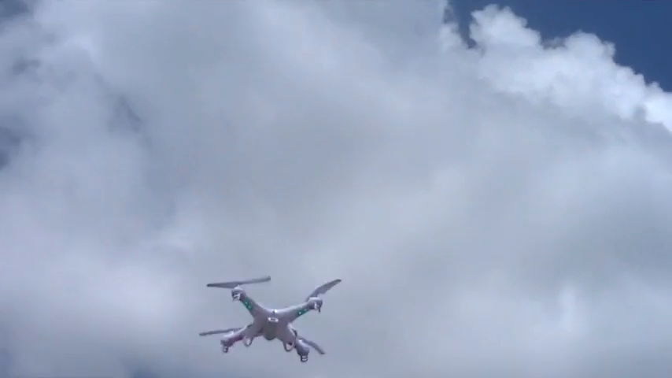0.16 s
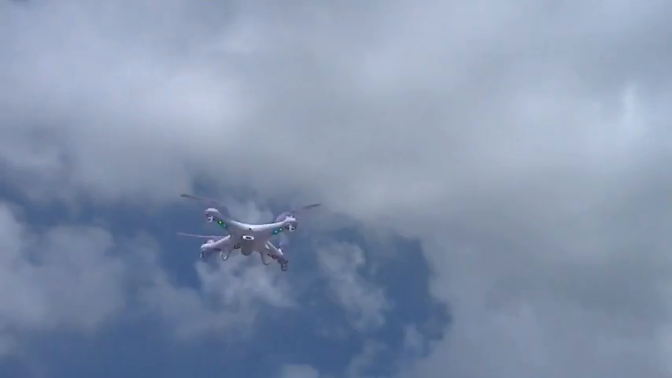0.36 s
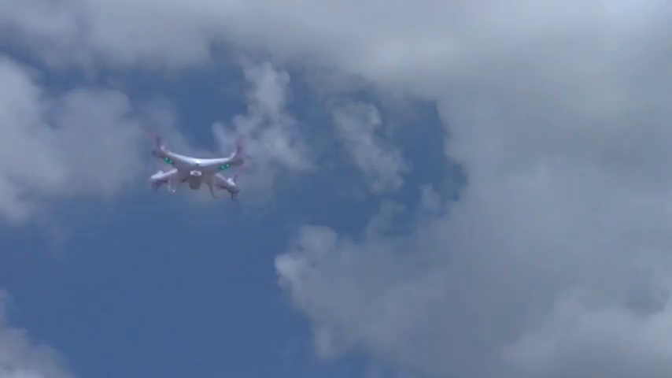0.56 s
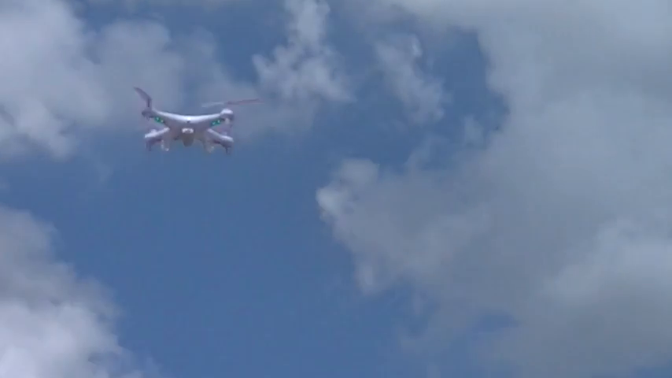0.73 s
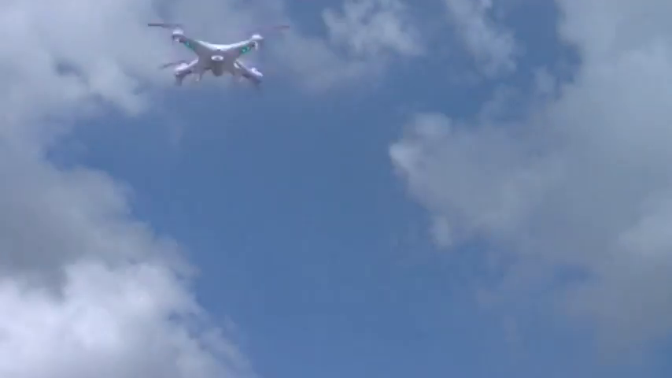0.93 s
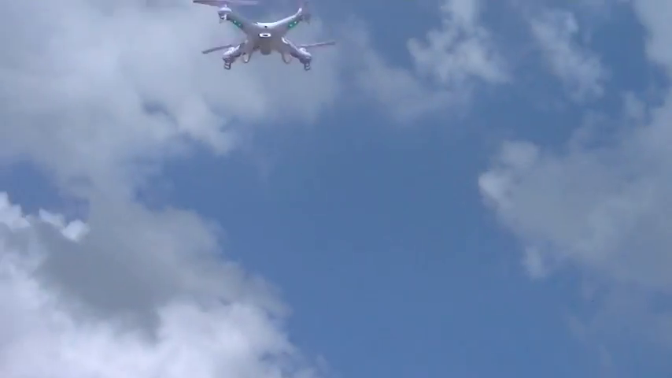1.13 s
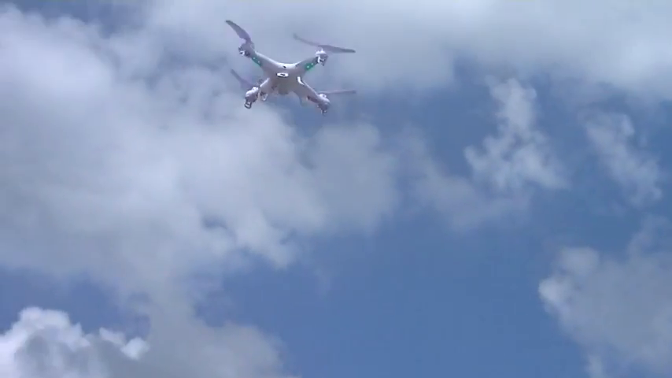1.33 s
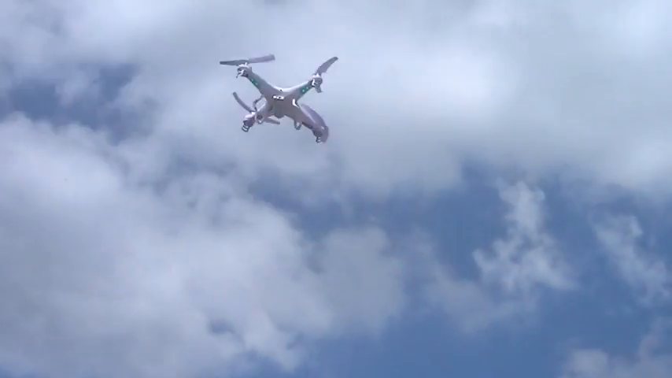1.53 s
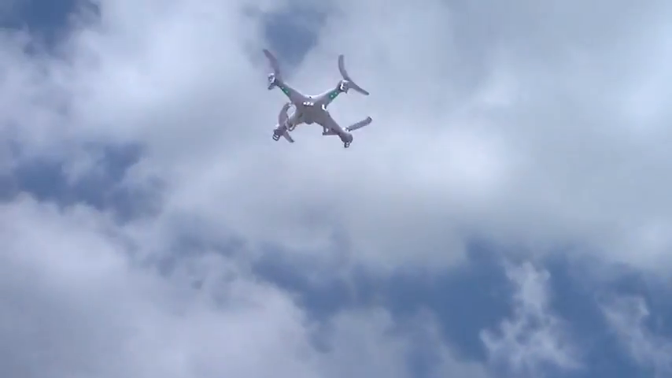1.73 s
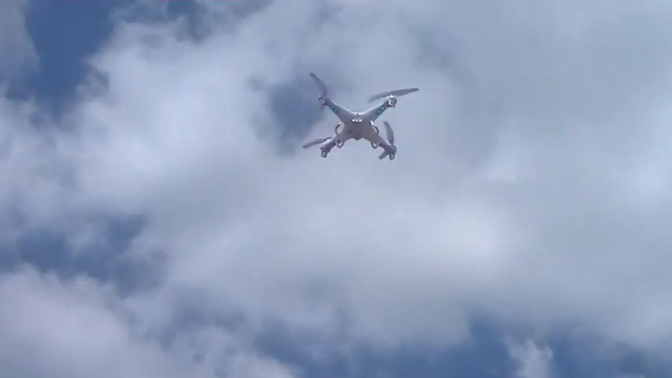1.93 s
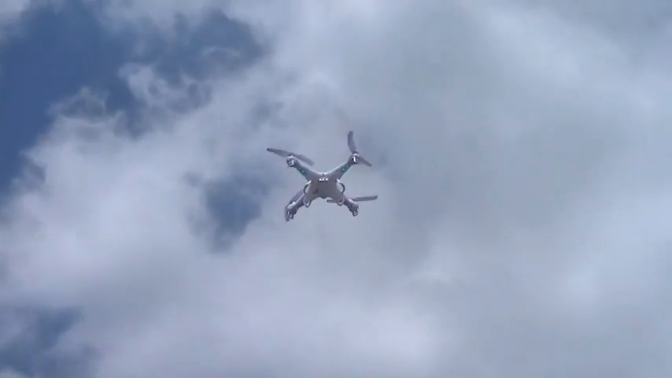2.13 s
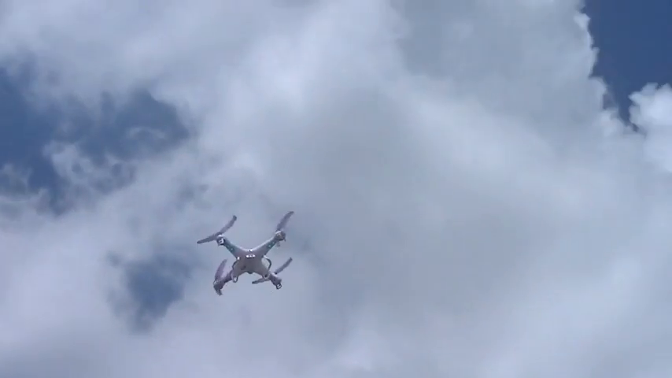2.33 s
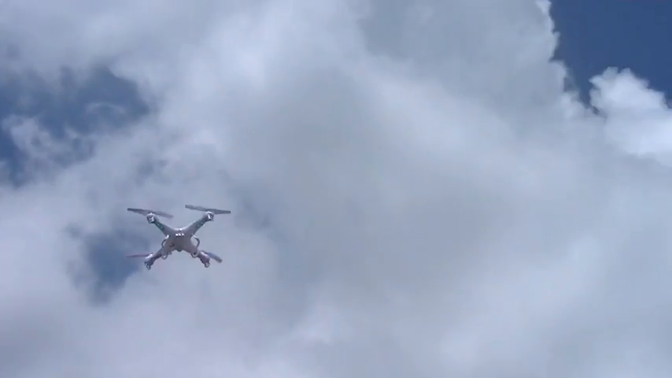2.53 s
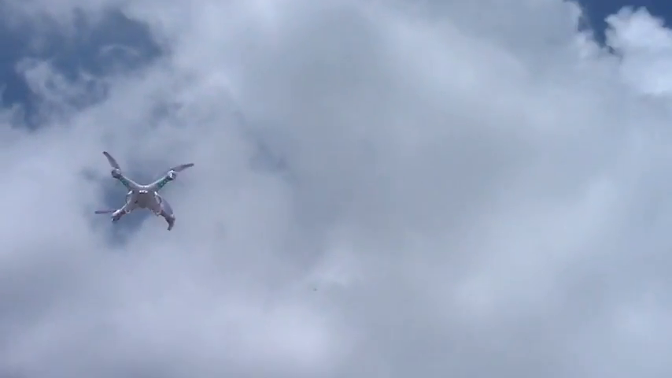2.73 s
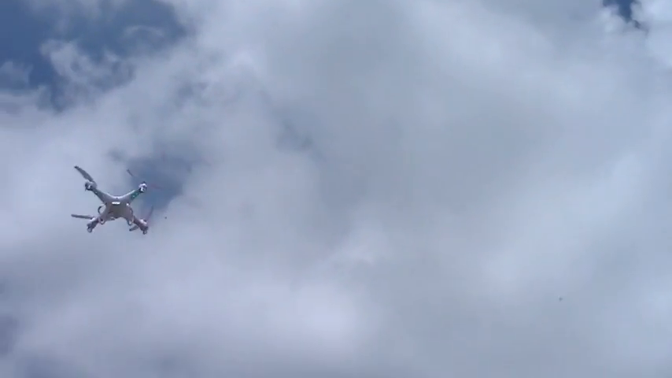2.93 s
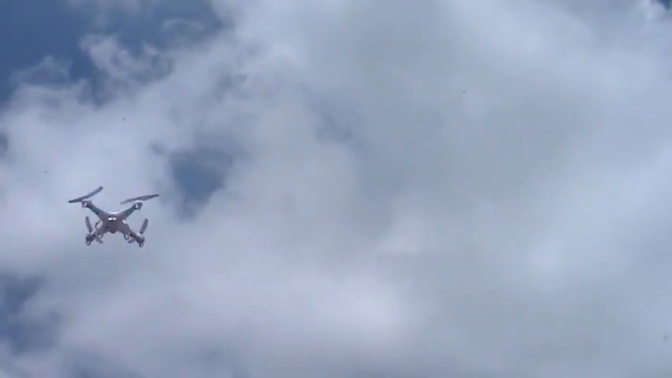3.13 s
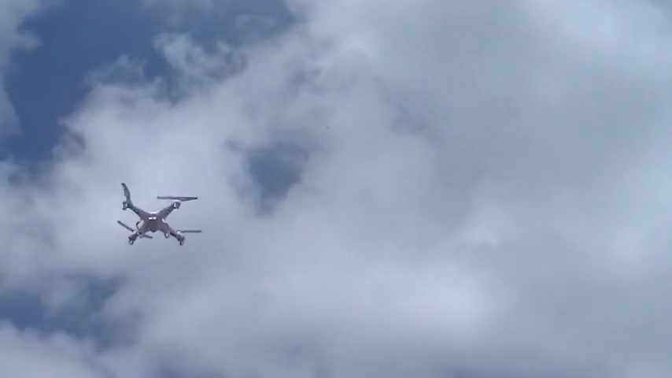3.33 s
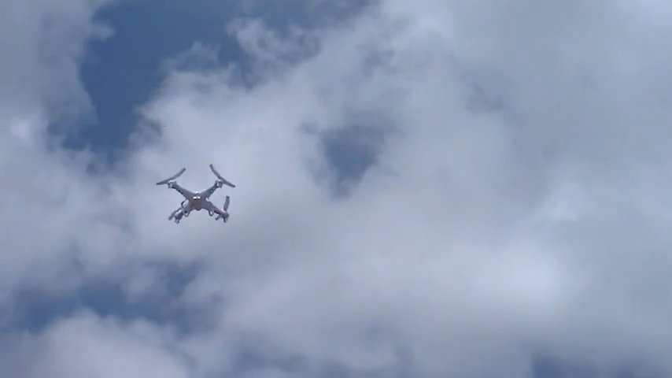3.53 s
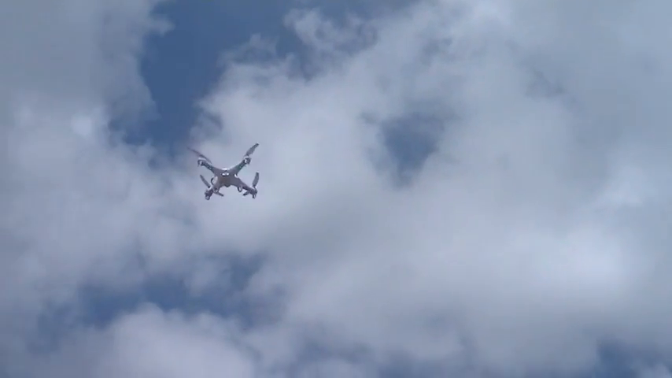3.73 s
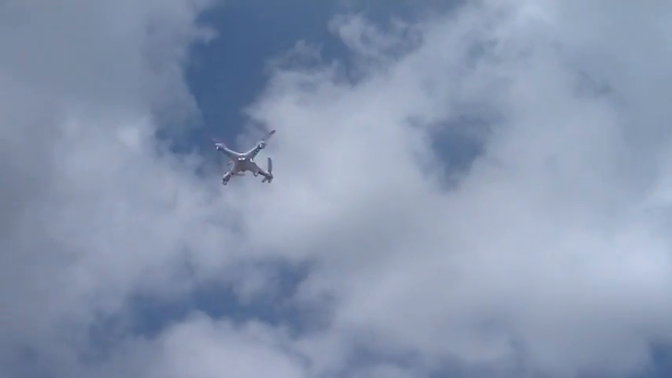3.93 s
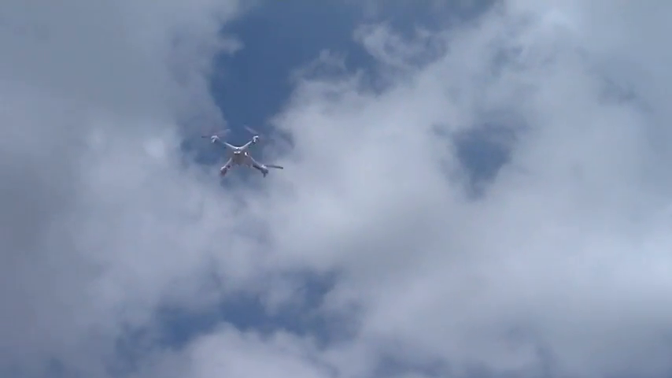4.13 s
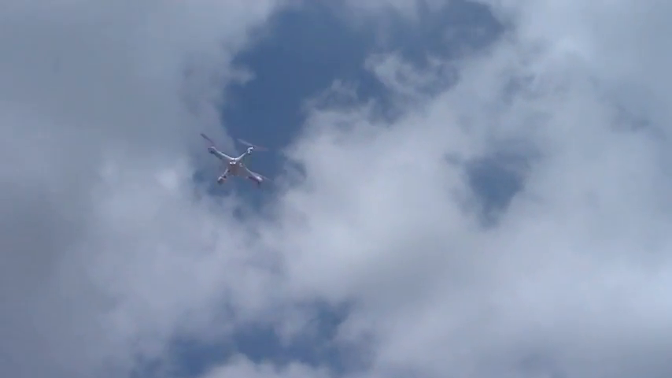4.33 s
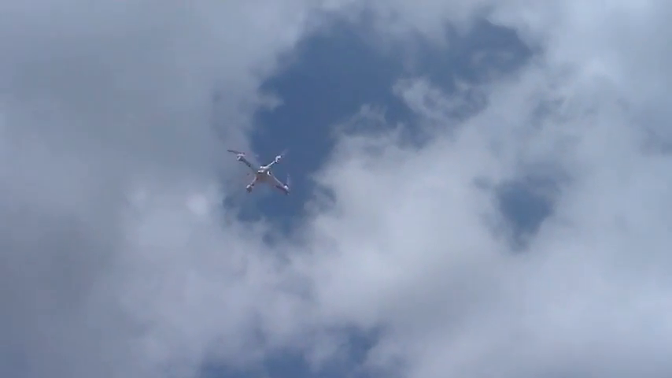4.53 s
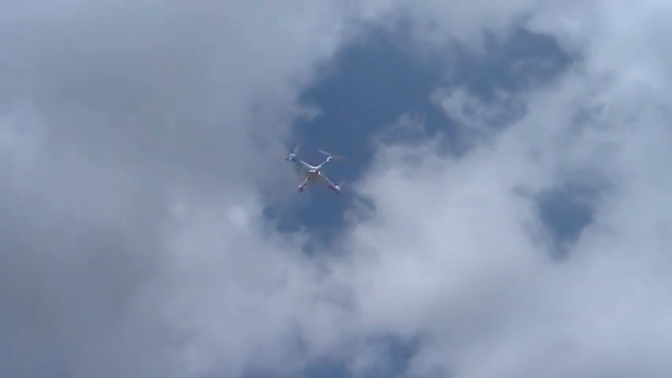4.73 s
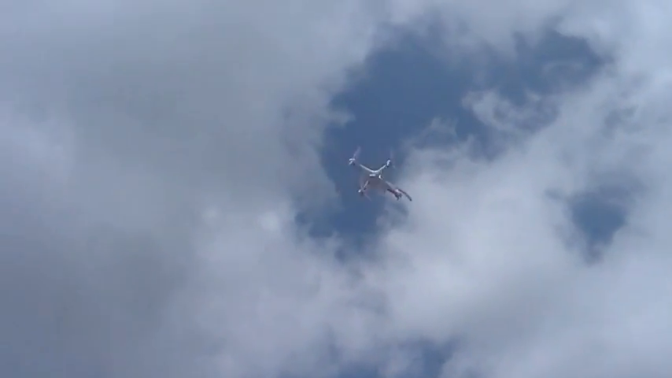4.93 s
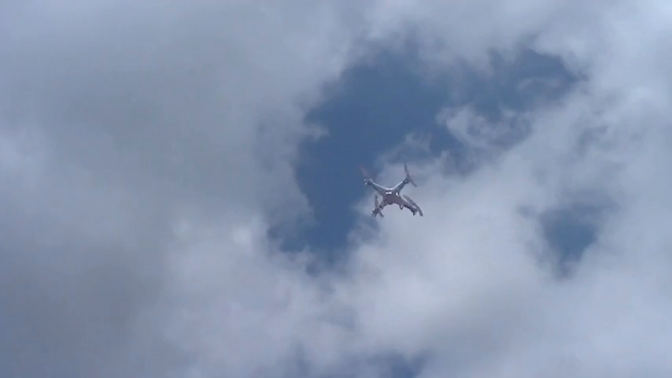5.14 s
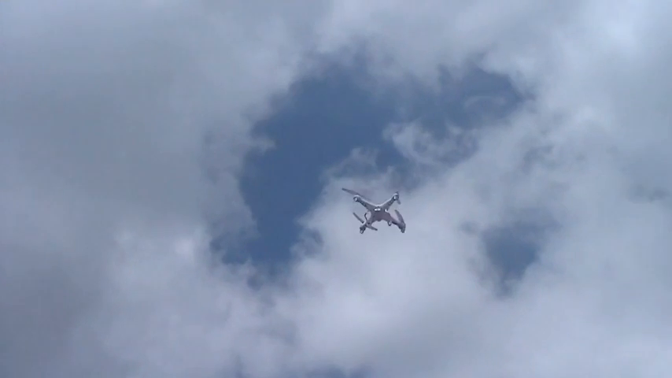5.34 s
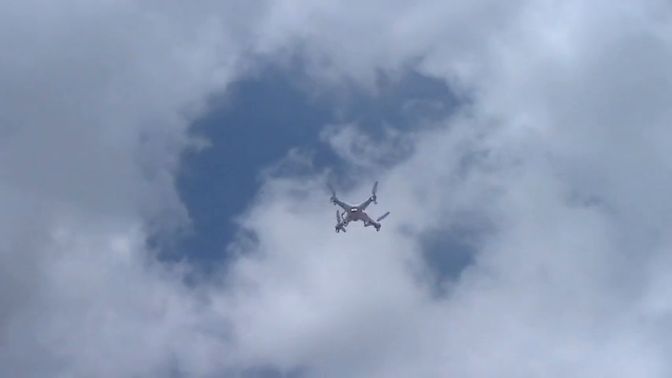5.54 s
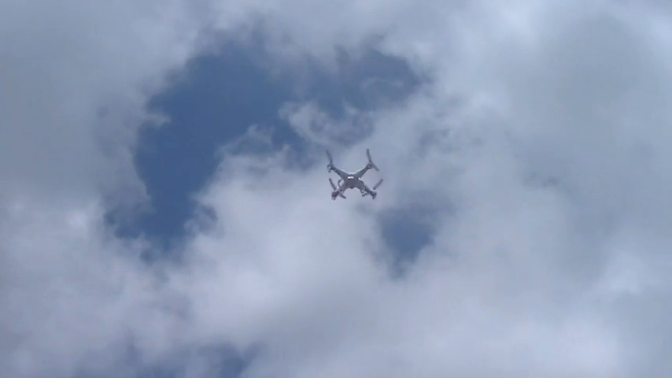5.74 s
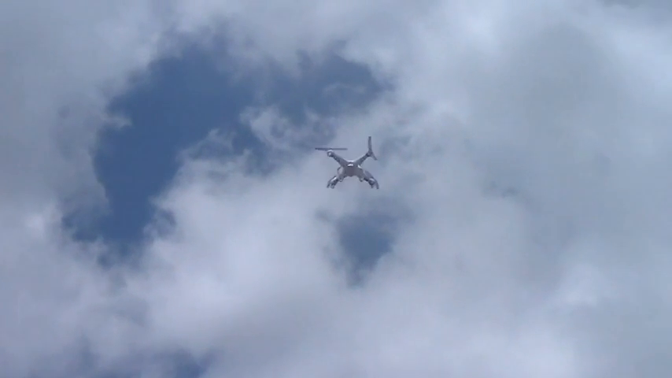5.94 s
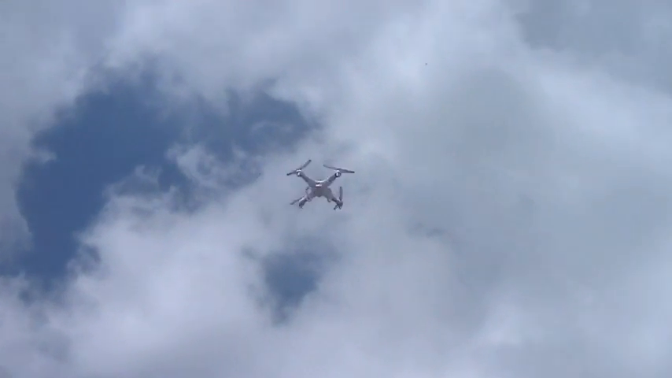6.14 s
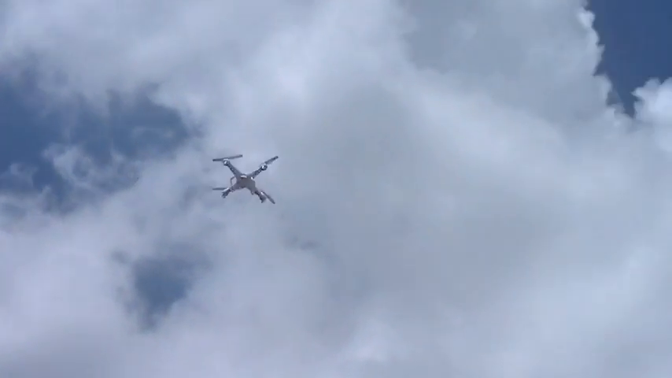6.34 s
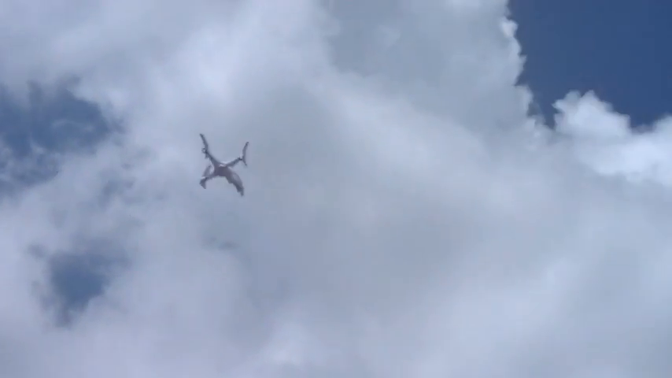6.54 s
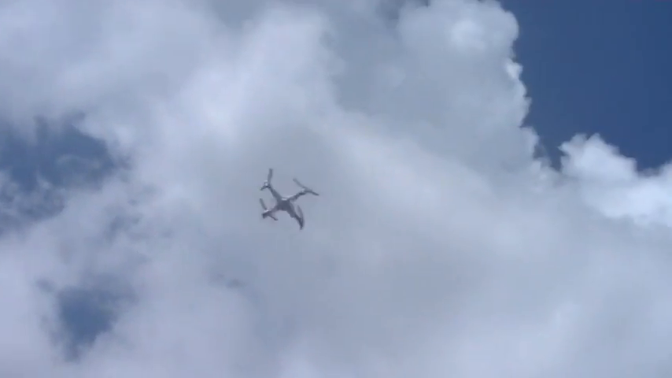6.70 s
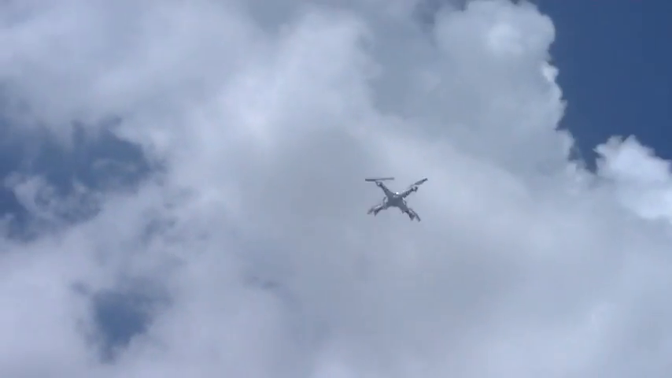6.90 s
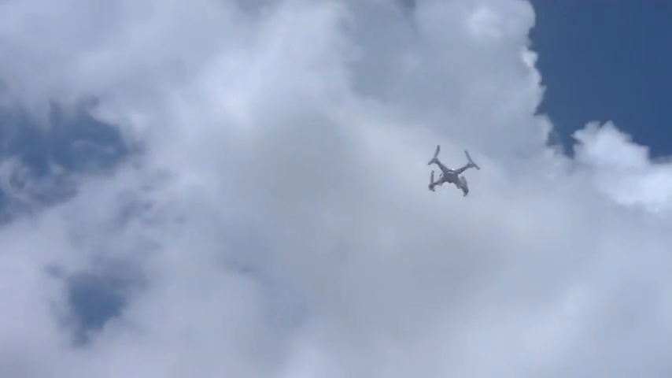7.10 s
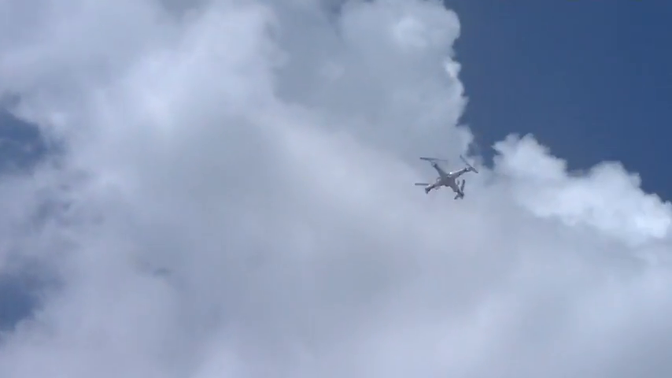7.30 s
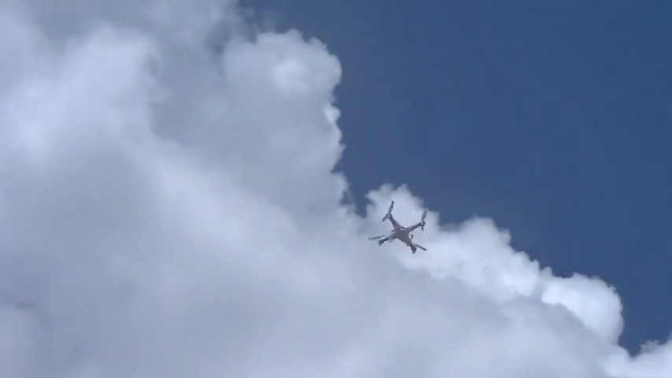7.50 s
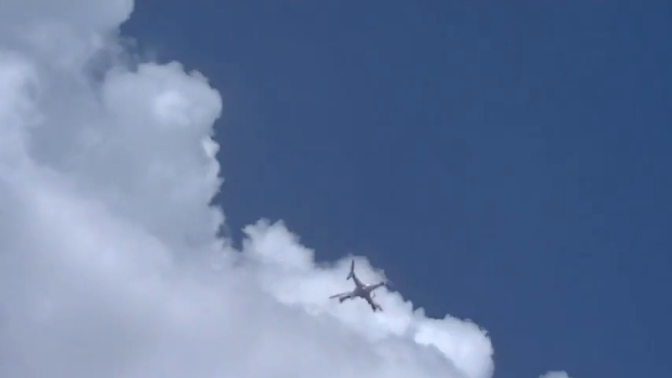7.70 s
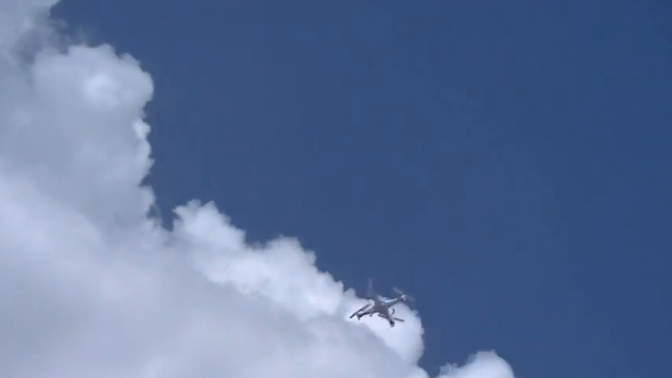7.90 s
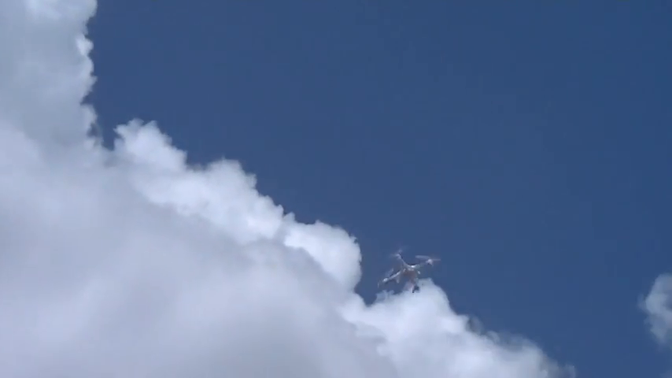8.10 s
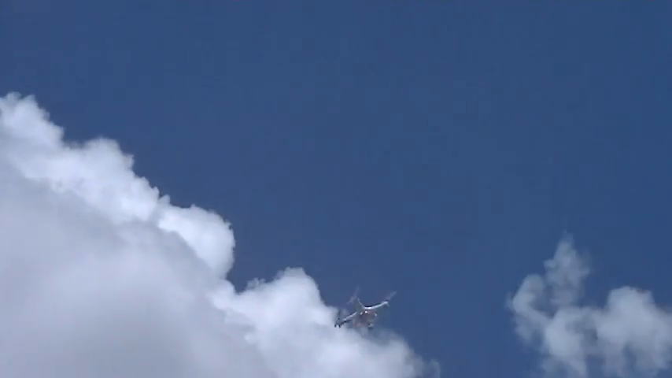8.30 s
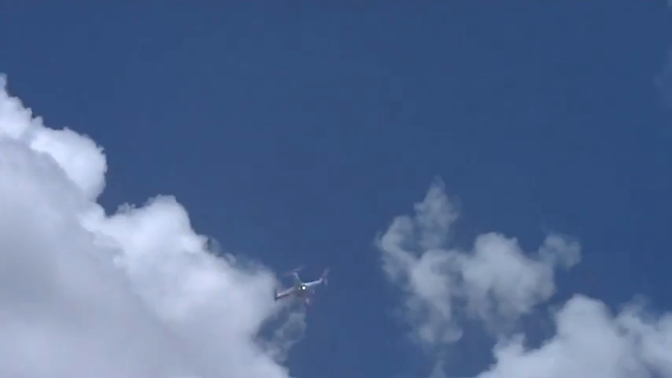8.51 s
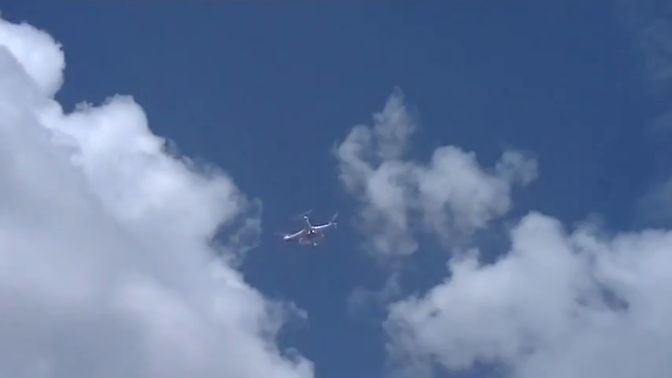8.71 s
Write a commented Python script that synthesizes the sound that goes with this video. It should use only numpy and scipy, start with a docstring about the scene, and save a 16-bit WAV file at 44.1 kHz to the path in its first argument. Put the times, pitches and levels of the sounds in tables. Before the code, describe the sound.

A small four-rotor drone whines and buzzes steadily overhead outdoors, its pitch wavering, with faint scuffs and a few low wind thumps near the end.

```python
"""Outdoors, a small four-rotor drone climbs away overhead from about three and a half metres.
Each geared rotor hums at its own blade rate, its gears whine at multiples of the motor speed,
the blades hiss and roar, and the motor drives whistle near the top of hearing.
The speed of approach bends the whistle and sets the distance; the gear load sets the level of the gears.
Close to the two-port microphone something scuffs now and then, and wind thumps it towards the end."""
import sys
import numpy as np
from scipy import signal
from scipy.fft import rfft, irfft
from scipy.io import wavfile
from scipy.ndimage import uniform_filter1d, map_coordinates

SR = 44100
rng = np.random.default_rng(int(sys.argv[2]) if len(sys.argv) > 2 else 0)


def master(y):
    """Save y as 16-bit WAV."""
    cut = np.clip(np.atleast_2d(y).T, -1, 1)
    pcm = np.round(cut * 32767)  # scale
    wavfile.write(sys.argv[1], SR, pcm.astype(np.int16))


def gain_from_db(level_db):
    """Convert decibel levels to linear amplitude factors (20 dB per decade)."""
    decades = np.asarray(level_db, float) / 20
    return 10 ** decades


N = 386304


def read(points, hz):
    """Reads a spectrum table, straight between its points on a log frequency axis."""
    f, value = np.transpose(points)
    return np.interp(np.log(hz + 1), np.log(f + 1), value)


def curves(rows):
    """Draws every column of a table after the time, sample by sample."""
    s, *columns = np.transpose(rows)
    return [np.interp(np.arange(N) / SR, s, c) for c in columns]


def evened(x):
    """Scales to rms 1."""
    return x / np.sqrt(np.mean(abs(x) ** 2) + 1e-20)


def wander(hz):
    """Chance movement of rms 1: noise low-passed at hz."""
    lowpass = signal.butter(2, hz, fs=SR, output="sos")
    return evened(signal.sosfilt(lowpass, rng.standard_normal(N)))


def colour(x, spectrum, patchy_db=0, fading=0, size=(5, 8)):
    """Shapes short-time spectra to rms 1; turbulent air adds level patches and fades each narrow band."""
    hz, t, z = signal.stft(x, SR, nperseg=2048, noverlap=1536)

    def chance(widen):
        grain = rng.standard_normal(z.shape)
        across = uniform_filter1d(grain, widen * size[0], 0)
        return evened(uniform_filter1d(across, size[1], 1))

    real, imaginary, patches = chance(1), chance(1), chance(4)
    share = np.clip(fading, 0, 1)
    gain = gain_from_db(read(spectrum, hz)[:, None] + patchy_db * patches)
    z = z * gain * (1 - share + share * (real + 1j * imaginary))
    return evened(signal.istft(z, SR, nperseg=2048, noverlap=1536)[1][:N])


def resonate(x, hz, width):
    """A band-pass resonance of gain 1; centre and width in Hz."""
    return signal.lfilter(*signal.iirpeak(hz, hz / width, SR), x)


# Far outdoor rumble, relative spectrum; columns: f/Hz, level/dB per Hz
AIR = [(12, -58), (20, -38), (184, -20.5), (236, -19), (295, -9.5), (369, -9.5), (441, -7.5), (700, -5.5),
       (910, -4.5), (1540, -120)]
AIR_DB = -71


def far_rumble():
    """Low rumble of the open air, arriving partly shared by the two ports."""
    a, b = (colour(rng.standard_normal(N), AIR, patchy_db=3.5) for _ in "LR")
    return gain_from_db(AIR_DB) * np.array([1.1 * a, 1.05 * a + 1.0 * b])


# Wind at the microphone; columns: t/s, level/dB
WIND = [(7.4, -104.5), (7.642, -63), (7.664, -63), (7.818, -84), (8.03, -79), (8.212, -87), (8.292, -75),
        (8.76, -74)]
# Relative spectrum of the wind; columns: f/Hz, level/dB per Hz
GUST = [(15, -52), (25, -20), (182, 1.5), (263, -6), (348, 6), (400, -18), (520, -39), (880, -120)]


def wind():
    """Wind on the microphone: lumpy low noise, only partly shared by the two ports."""
    a, b = (colour(rng.standard_normal(N), GUST) * gain_from_db(4.3 * wander(40)) for _ in "LR")
    silent_before = (WIND[0][0] - .05, -120)
    level = gain_from_db(curves([silent_before, *WIND])[0])
    return level * np.array([1.0 * a, 0.57 * a + 1.0 * b])


# Wind thumps at the microphone, level midway between the ports; columns: t/s, envelope peak level/dB, f/Hz
THUMPS = [(7.318, -45.5, 510), (7.489, -57, 330), (7.536, -61, 130), (7.56, -45, 190), (7.608, -51, 140),
          (7.633, -41.5, 330), (7.638, -51, 110), (7.67, -48, 170), (7.705, -58, 110), (7.79, -66, 120),
          (7.868, -59, 150), (7.963, -59, 110), (8.016, -61, 110), (8.07, -63, 140), (8.14, -66, 85),
          (8.305, -66, 100), (8.372, -58, 150), (8.412, -60, 140), (8.548, -62, 160), (8.636, -62, 180)]


def thumps():
    """Low wind puffs of a cycle or two, out of step on the two ports and stronger on the right."""
    out, t = np.zeros((2, N + SR)), np.arange(-2000, 2000) / SR
    lean_db = np.array([[-1.5], [1.5]])
    for (s, db, hz), turn in zip(THUMPS, rng.random((len(THUMPS), 2))):
        swell = np.exp(-(t * hz / .75) ** 2)
        puff = swell * np.cos(2 * np.pi * hz * t + 3. * turn[:, None])
        start = round(s * SR) - 2000
        out[:, start:][:, :4000] += gain_from_db(db + lean_db) * puff
    return out[:, :N]


# Scuffs close to the microphone; columns: t/s, level/dB, length/s (between the 1/e points), centre f/Hz
SCUFFS = [(0.54, -57, 0.29, 630), (3.78, -56, 0.083, 560), (4.434, -57, 0.066, 720),
          (5.634, -67, 0.27, 513), (5.947, -49, 0.13, 930), (5.972, -53.5, 0.044, 910),
          (6.19, -51, 0.023, 1330), (7.572, -54.5, 0.18, 800), (8.059, -47, 0.0091, 1510),
          (8.268, -38, 0.058, 1200), (8.249, -40, 0.0033, 1300), (8.271, -46, 0.003, 1300),
          (8.279, -45, 0.0035, 1500), (8.29, -45, 0.0032, 1300), (8.595, -50, 0.0039, 2000),
          (8.62, -46, 0.0043, 1500), (8.54, -49, 0.17, 1460), (8.63, -51, 0.08, 1650),
          (8.713, -44, 0.088, 1280)]


def scuffs():
    """Short rubs: noise and uneven clicks through a broad resonance with a tight core and a brighter edge."""
    out = np.zeros(N)
    clicks = rng.random(N) * (rng.random(N) < 300 / SR)  # about 300 a second
    grit = rng.standard_normal(N) * (1 + 7. * clicks)
    for s, db, length, hz in SCUFFS:
        stroke = np.exp(-abs((np.arange(N) / SR - s) / (length / 2)) ** 2)
        broad = resonate(grit, hz, 2.04 * hz)
        core = resonate(resonate(grit, hz, 0.84 * hz), hz, 0.84 * hz)
        bright = resonate(grit, 3 * hz, 1.1 * hz)
        limits = signal.butter(2, [0.45 * hz, 6.9 * hz], "band", fs=SR)
        rub = signal.lfilter(*limits, broad + 1.05 * core + 0.22 * bright)
        out += gain_from_db(db) * stroke * evened(rub)
    return out


# Drive whistle as it reaches the microphone, before a lift of 2 dB; columns: t/s, level/dB
WHISTLE_DB = [(0, -67), (.17, -56), (.5, -66), (.7, -58), (1.3, -57), (1.6, -58), (2, -57), (2.3, -62),
              (2.9, -66), (4.3, -66), (5, -72), (5.3, -65), (6.3, -66), (6.9, -69), (7.6, -66), (8.76, -71)]
# Speed of the drone towards the microphone; columns: t/s, speed/(m/s)
APPROACH = [(0, 1.44), (.5, .05), (1.25, 0), (1.7, -.7), (2.15, -1.2), (2.8, -.65), (3.9, -.86),
            (4.6, -.46), (5.2, .05), (5.8, -.23), (6.3, -.12), (6.95, -1.05), (7.5, -.35), (8.1, .5),
            (8.76, .23)]
# Average offsets of two weaker drive tones, one above and one below the loudest; f/Hz
BEAT_HZ = (2.8, 7)
WHISTLE_HZ = 14770  # motor drive switching tone at rest


def drive_whistle(beat):
    """Motor drives whistle almost alike and beat unevenly; motion bends them, the blades add side tones."""
    doppler = 1 + curves(APPROACH)[0] / 343
    angle = 2 * np.pi * np.cumsum(WHISTLE_HZ * doppler) / SR
    apart = [2 * np.pi * np.cumsum(hz * (1 + .6 * wander(1.5))) / SR for hz in BEAT_HZ]
    tones = np.sin(angle) + .55 * np.sin(angle + apart[0]) + .4 * np.sin(angle - apart[1])
    return gain_from_db(curves(WHISTLE_DB)[0] + 2) * tones * (1 + .22 * beat)


def throbbing(beats, depth):
    """Air noise from the four rotors, each swelling a little at its own blade rate."""
    return ((1 + depth * beats) * rng.standard_normal(beats.shape)).sum(0)


# Relative spectrum of the roar; columns: f/Hz, level/dB per Hz
ROAR = [(59, -70), (100, -34.5), (301, -33), (378, -37), (453, -10), (792, -16.5), (1250, 3), (1900, -2.5),
        (2570, -1.5), (3180, -31), (3700, -28), (4810, -25), (8140, -120)]
ROAR_DB = -39.5  # at 1 m and cruise load


def roar(beats):
    """Turbulent rotor wash: throbbing low and middle noise of uneven strength."""
    return colour(throbbing(beats, 0.092), ROAR, patchy_db=0.5) * gain_from_db(ROAR_DB + 1.9 * wander(10.0))


# Relative spectrum of the blade hiss; columns: f/Hz, level/dB per Hz
HISS = [(1760, -42), (3000, -9), (3520, -9.5), (4080, -4.5), (5480, -9), (6810, -8), (7620, -10),
        (9200, -14.5), (11800, -14), (13900, -32.5), (15100, -20), (15700, -38), (15950, -60)]
HISS_DB, HISS_SHARE = -32.5, 0.31  # at 1 m and cruise load; share of a load change in dB that it follows


def hiss(beats, load_change_db):
    """Air torn by the blades: throbbing high noise that partly follows the gear load."""
    level_db = HISS_DB + HISS_SHARE * load_change_db + 0.58 * wander(37)
    return colour(throbbing(beats, 0.069), HISS, patchy_db=1.5) * gain_from_db(level_db)


def drifting(x, hz, width):
    """A steep resonance whose centre wanders by a share of 0.025 rms."""
    turn = np.exp(2j * np.pi * np.cumsum(hz * (1 + .025 * wander(2.43))) / SR)
    r = np.exp(-np.pi * width / SR)
    # shift the band down to 0 Hz, smooth it there, shift it back
    return 2 * (turn * signal.lfilter([(1 - r) ** 2], [1, -2 * r, r * r], x / turn)).real


# Gear resonances; columns: f/Hz, width/Hz, relative level/dB
GEARBOX = [(4040, 380, 5), (4510, 350, 16), (4850, 170, 15)]
# Extra level of every gear resonance but the first; columns: t/s, level/dB
UPPER_DB = [(0, 14), (1, 2), (2, 2), (2.5, -11), (3.3, 10), (5, 7), (6, 14), (6.8, 6), (7.1, -5),
            (8.76, -16)]


def gear_rasp(beats):
    """Gears rasp: throbbing noise rings the drifting resonances of the gearbox."""
    drive = throbbing(beats, 0.089)
    rasp = np.zeros(N)
    for k, (hz, width, db) in enumerate(GEARBOX):
        level_db = db + (k > 0) * curves(UPPER_DB)[0]
        rasp += gain_from_db(level_db) * drifting(drive, hz, width)
    return evened(rasp)


def glides(rows):
    """Short gliding tones that swell, waver, break up and fade, each in its own way."""
    out, waver, flutter_db = np.zeros(N), .004 * wander(14), 3.2 * wander(25)
    for s, end, hz, end_hz, db in rows:
        at = np.arange(round(max(s - .02, 0) * SR), min(round((end + 0.0176) * SR), N))
        own = (at + rng.integers(N)) % N  # each tone reads its own stretch of chance
        pitch = np.linspace(hz, end_hz, len(at)) * (1 + waver[own])
        pitch = pitch + 2500 * waver[own] * (hz < 1000)  # low rotor tones waver by several Hz more
        angle = 2 * np.pi * np.cumsum(pitch) / SR
        # 27 meshes per blade pass: side tones flank a gear whine
        wobble = .4 * (hz > 2000) * np.sin(angle / 27)
        fade = signal.windows.tukey(len(at), .4)
        out[at] += gain_from_db(db + flutter_db[own]) * np.sin(angle + wobble) * fade
    return out


# Rotor and gear tones that stand out for a moment, as they reach the microphone;
# columns: start t/s, end t/s, start f/Hz, end f/Hz, level/dB
FLARES = [(0.36, 0.47, 610, 615, -62), (0.52, 0.57, 670, 650, -57), (0.62, 0.75, 650, 690, -62),
          (0.5, 0.56, 505, 495, -58), (0.47, 0.55, 345, 335, -62), (0.6, 0.7, 330, 345, -63),
          (1.01, 1.13, 1385, 1432, -46.5), (1.5, 1.64, 1620, 1615, -61), (0.3, 0.39, 4000, 4300, -48),
          (0.43, 0.49, 4000, 4950, -44), (0.48, 0.51, 3700, 4050, -46), (0.64, 0.69, 4400, 4600, -45),
          (0.97, 1.04, 3860, 4100, -46), (1.04, 1.17, 4470, 4950, -48), (1.11, 1.17, 4170, 4400, -46),
          (1.2, 1.3, 3960, 3930, -48), (1.35, 1.47, 4080, 4000, -40.5), (2.13, 2.18, 3850, 4050, -45),
          (2.22, 2.31, 3700, 3900, -51), (2.38, 2.6, 3970, 3960, -49), (2.72, 2.9, 3930, 3960, -50),
          (2.78, 2.84, 4440, 4540, -52), (3.02, 3.26, 3950, 4400, -52), (3.42, 3.48, 3850, 4040, -52),
          (3.63, 3.7, 4280, 4400, -52.5), (3.69, 3.75, 3720, 3800, -52), (3.86, 3.93, 3950, 3960, -46.5),
          (4.01, 4.21, 3960, 4050, -46.5), (4.26, 4.3, 3250, 4050, -50), (4.31, 4.37, 4380, 4500, -50),
          (4.31, 4.44, 2890, 2890, -54), (4.52, 4.6, 3820, 3900, -51), (4.68, 4.72, 3820, 3800, -50),
          (4.81, 4.87, 3780, 3850, -50), (5.02, 5.06, 3780, 4120, -46), (5.07, 5.1, 3960, 3960, -48),
          (5.6, 5.7, 3800, 3960, -54), (6.02, 6.13, 3680, 3860, -50), (6.46, 6.58, 4040, 4250, -54),
          (6.87, 6.93, 3960, 3960, -48), (7.08, 7.2, 3930, 4060, -51), (7.26, 7.44, 4010, 3960, -51),
          (8.14, 8.4, 3150, 3260, -56), (8.35, 8.49, 3760, 4230, -55), (8.68, 8.75, 3920, 4030, -56)]


def standout_tones():
    """Single rotor and gear tones flare up and glide."""
    return glides(FLARES)


def gear_whines():
    """Fainter gear whines at random slide upward, louder while the motor speeds are restless."""
    per_s, low_hz, high_hz, rise_hz_per_s = 34, 3680, 4750, 1300
    when, length, place, rise, size = rng.random((400, 5))[:round(per_s * N / SR)].T
    hz = low_hz + place ** 1.5 * (high_hz - low_hz)
    s, length = when * N / SR, 0.028 + 0.143 * length
    end_hz = hz + 2 * rise * rise_hz_per_s * length  # the rise averages rise_hz_per_s
    return glides(zip(s, s + length, hz, end_hz, -8. * size)) * curves(HUNTING)[0] ** 0.28


# Colour of the gear tones; columns: f/Hz, gain level/dB
MESH = [(3000, -8), (3750, -3), (4050, 4.5), (4500, 4.5), (5000, 5), (5500, 1), (6300, -8)]


def mesh_colour(tones):
    """The gearbox passes some gear tones more strongly than others."""
    return irfft(rfft(tones) * gain_from_db(read(MESH, np.fft.rfftfreq(N, 1 / SR))), N)


# Gain of the blade harmonics; columns: f/Hz, level/dB
HUM = [(150, -34.5), (300, -15.5), (600, -14.5), (1200, 3.5), (1600, 13.5), (2000, 0.5), (2600, 6),
       (3300, -5), (4200, 5), (5300, 6), (6500, -13.5), (7500, -12)]
# Gear tones, strongest at the nine teeth of the pinion; columns: multiple of motor speed, relative level/dB
ORDERS_DB = [(8, -17), (9, -2.5), (10, -3.5), (11, -8), (12, -15)]
# How restlessly the motor speeds are corrected; columns: t/s, restlessness/(0-1)
HUNTING = [(0, .15), (2.2, .15), (2.5, 1), (6.75, 1), (6.9, .35), (7.4, .35), (7.5, 1), (8.25, 1),
           (8.35, .3), (8.76, .3)]
TURNS_PER_BLADE = 3  # motor turns for each blade pass


def rotor(rows, hum_db, shaft_db, gear_db, hunting, clear_s):
    """One geared rotor: returns its blade harmonics with the shaft tone, its blade beat and its gear tones."""
    restless = curves(HUNTING)[0]
    speed = curves(rows)[0] * (1 + .0025 * wander(14) + hunting * restless * wander(4))
    angle = 2 * np.pi * (np.cumsum(speed) / SR / TURNS_PER_BLADE + rng.random())
    swell_db = 5 * np.tanh(wander(12))
    # a pulse each blade pass: 50 equal harmonics
    pulses = np.sin(50.5 * angle) / (np.sin(angle / 2) + 1e-9) * .5
    blades = colour(np.clip(pulses, -51, 51), HUM, patchy_db=6, fading=0.3, size=(2, 24))
    # the airframe rings with the shaft tone at 490 Hz, 16 Hz wide
    ring = resonate(np.sin(TURNS_PER_BLADE * angle), 490, 16)
    hum = gain_from_db(hum_db) * blades + gain_from_db(shaft_db + 0.78 * swell_db) * ring
    # each blade pass shakes the mesh: side tones flank every gear tone
    wobble = .6 * np.sin(angle)
    tones = np.zeros(N)
    for order, db in ORDERS_DB:
        own_swell_db = np.roll(swell_db, rng.integers(N))
        tones += gain_from_db(db + own_swell_db) * np.sin(round(order) * TURNS_PER_BLADE * angle + wobble)
    blur_db = -3 * restless  # restless speeds smear the gear tones
    muffle_db = np.clip(300 * (clear_s - np.arange(N) / SR), 0, 14)  # gone at clear_s
    return hum, np.cos(angle), gain_from_db(gear_db + blur_db - muffle_db) * tones


# One short echo; columns: t/s, delay/ms, strength/(0-1)
ECHO = [(0, 0.34, 0.57), (.2, 0.32, 0.5), (.4, 0.33, 0.31), (.6, 0.317, 0.2), (8.76, 0.3176, 0.54)]


def reflected(x):
    """A near reflection adds one short echo whose delay and strength drift."""
    delay_ms, strength = curves(ECHO)
    at = np.arange(N) - delay_ms * SR / 1000
    echo = map_coordinates(x, [at], order=3)
    return (x + strength * echo) / np.sqrt(1 + strength ** 2)


# Motor speeds, one list a rotor; columns: t/s, motor speed/(turns per s)
ROTORS = [
    [(0, 408), (.85, 420), (.95, 433), (1.05, 461), (1.18, 487), (1.3, 494), (1.37, 477), (1.5, 478),
     (1.7, 488), (1.85, 471), (2, 477), (2.3, 431), (2.6, 435), (2.9, 449), (3.3, 466), (3.9, 470),
     (4.6, 456), (6, 453), (6.6, 434), (7.4, 431), (8.1, 443), (8.76, 482)],
    [(0, 446), (.3, 448), (.41, 475), (.435, 408), (.47, 413), (.52, 443), (.63, 445), (.69, 456),
     (.72, 449), (.77, 462), (.82, 487), (.86, 490), (.89, 468), (1.0, 462), (1.04, 449), (1.2, 438),
     (1.36, 449), (1.82, 459), (2.12, 428), (2.18, 441), (2.5, 444), (7.3, 445), (8.3, 424), (8.5, 462),
     (8.62, 436), (8.76, 449)],
    [(0, 395), (1.9, 411), (2.5, 403), (3, 418), (4.2, 429), (4.8, 426), (5.3, 417), (7, 405), (8, 396),
     (8.76, 414)],
    [(0, 420), (.25, 450), (.42, 456), (.48, 524), (.56, 500), (.72, 503), (.87, 516), (1.1, 516),
     (1.35, 535), (1.7, 552), (2, 520), (2.7, 495), (4.5, 504), (6, 495), (8.76, 504)],
]
# One row a rotor; columns: hum level/dB, shaft tone level/dB, gear tone level/dB,
# hunting/(share of the speed), t/s at which its gear tones come clear
VOICES = [(2, -15, -4, .009, .94), (-3, -26, -4, .012, .64), (2, -26, -10, .007, 0),
          (-4, -22, -7, .013, .85)]
# Gear load, as the reference level of the gears at 1 m; columns: t/s, level/dB
LOAD = [(0, -41.5), (.29, -33.5), (.51, -30), (.9, -31.5), (1.32, -32.5), (1.61, -33), (2.05, -35),
        (2.66, -38.5), (3.24, -31.5), (3.73, -33.5), (4.03, -33), (5.15, -34.5), (5.81, -34.5),
        (7.12, -34.5), (7.45, -42.5), (7.8, -42.5), (8.32, -41), (8.49, -39.5), (8.76, -45)]
CRUISE_DB = -33  # load at which hum, roar and hiss have their stated levels
HUM_DB, BODY_SHARE = -34, 0.013  # at 1 m; share of a load change in dB that hum and roar follow
START_M = 3.527  # distance from the microphone at first


def drone():
    """Four rotors with hum, roar, hiss and gears, thinning with distance; flares and whistle join as heard."""
    load_db = curves(LOAD)[0]
    load_change_db = load_db - CRUISE_DB
    distance_m = START_M - np.cumsum(curves(APPROACH)[0]) / SR
    rotors = [rotor(rows, *voice) for rows, voice in zip(ROTORS, VOICES)]
    hums, beats, tones = np.transpose(rotors, (1, 0, 2))
    hum = evened(hums.sum(0)) * gain_from_db(HUM_DB)
    body = (hum + roar(beats)) * gain_from_db(BODY_SHARE * load_change_db)
    motors = mesh_colour(tones.sum(0))
    gears = (gear_rasp(beats) * gain_from_db(-9) + gear_whines() * gain_from_db(-8) + motors) * gain_from_db(load_db)
    near = reflected(body + hiss(beats, load_change_db) + gears)
    return near / distance_m + standout_tones() + drive_whistle(beats[2])


# Level of the scrambled side signal against the mid; columns: f/Hz, level/dB
SIDE_DB = [(60, 0), (120, -3), (240, -8), (480, -20), (950, -18), (1890, -24.5), (3770, -20), (7520, -22.5),
           (15000, -46)]
LEFT_DB = -.2  # the right port gets the opposite


def scene():
    """The two ports hear nearly the same; a scrambled share of the sound differs between them."""
    mid = drone() + scuffs()
    hz = np.fft.rfftfreq(N, 1 / SR)
    scrambled = colour(mid, [(20, 0), (20000, 0)], fading=1, size=(2, 2)) * mid.std()
    side = irfft(rfft(scrambled) * gain_from_db(read(SIDE_DB, hz)), N)
    ports = np.array([(mid + side) * gain_from_db(LEFT_DB), (mid - side) * gain_from_db(-LEFT_DB)])
    return ports + thumps() + wind() + far_rumble()


def low_pass(x):
    """Removes everything above the highest recorded frequency."""
    return signal.sosfilt(signal.butter(12, 15750, fs=SR, output="sos"), x)


def record(dry):
    """Turns the finished mix of the two ports into the sound that is written."""
    return low_pass(dry)


dry = scene()
out = record(dry)
master(out)
```